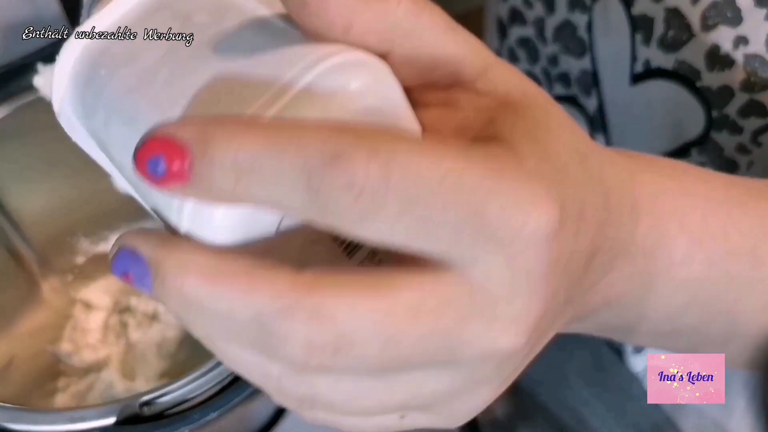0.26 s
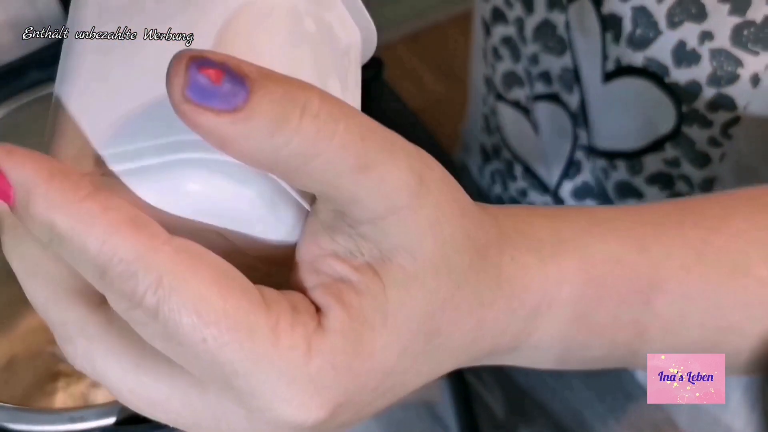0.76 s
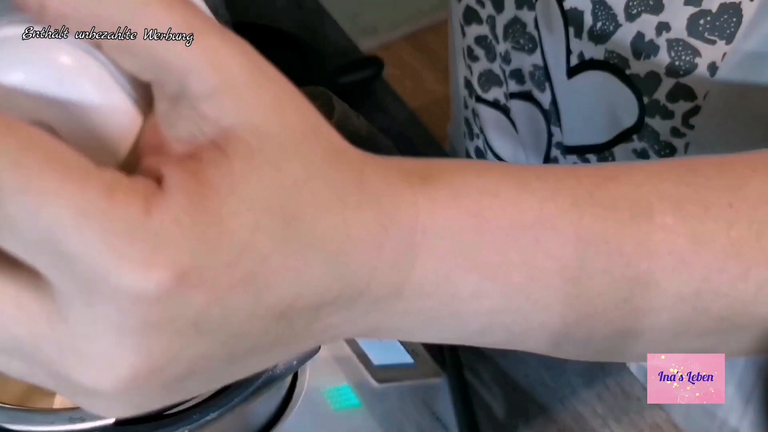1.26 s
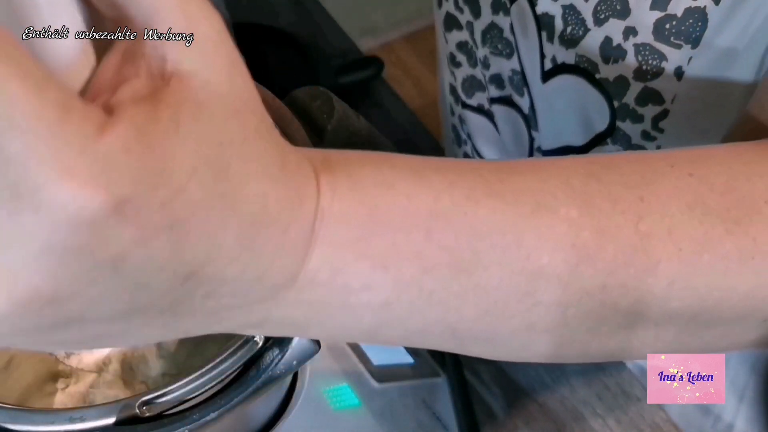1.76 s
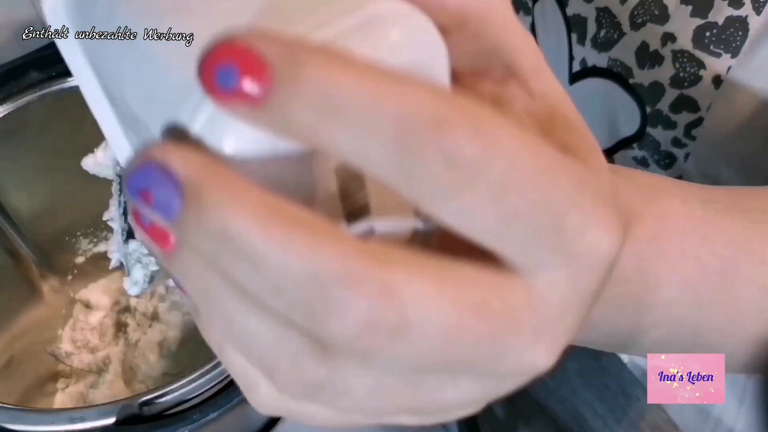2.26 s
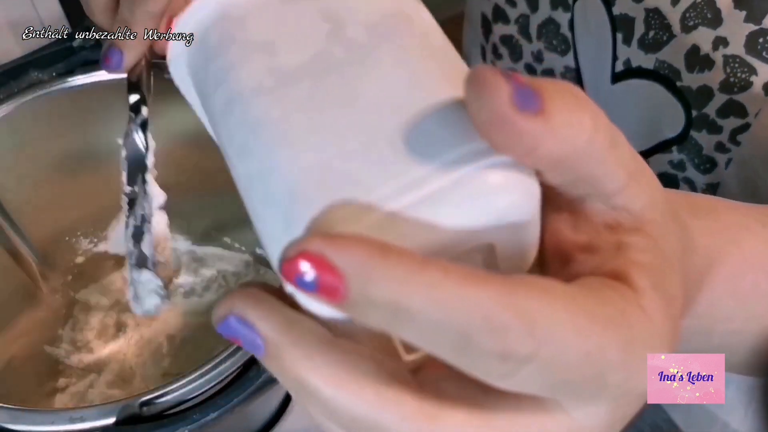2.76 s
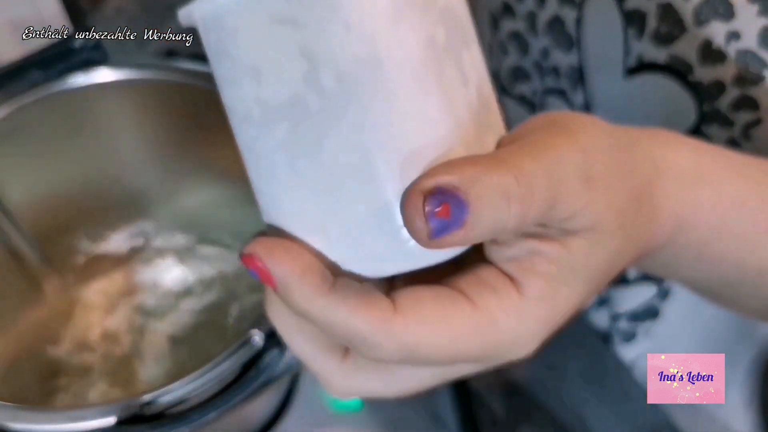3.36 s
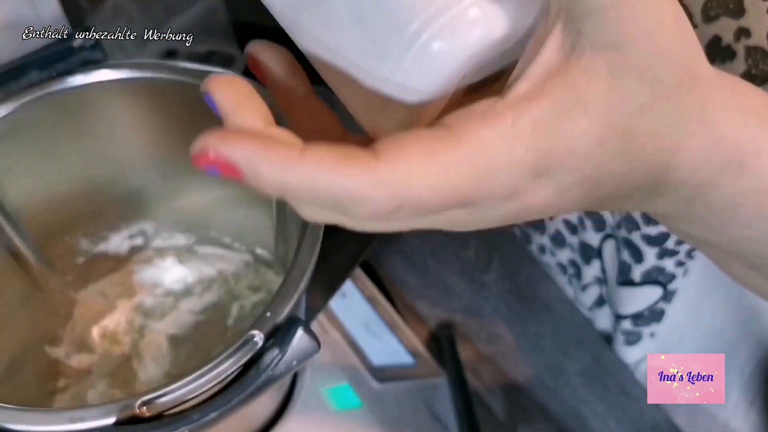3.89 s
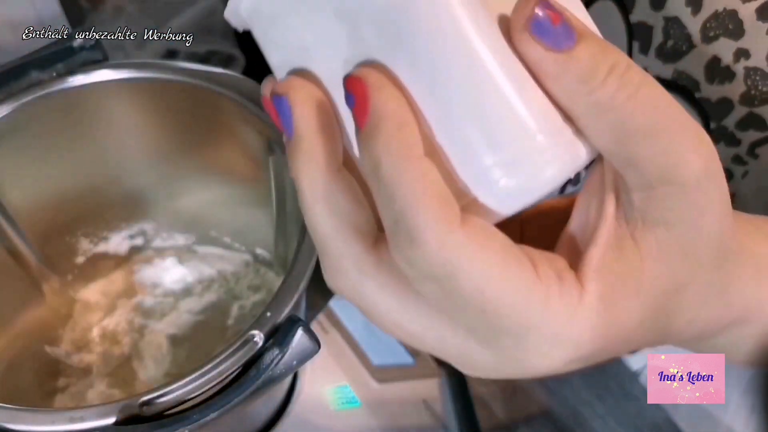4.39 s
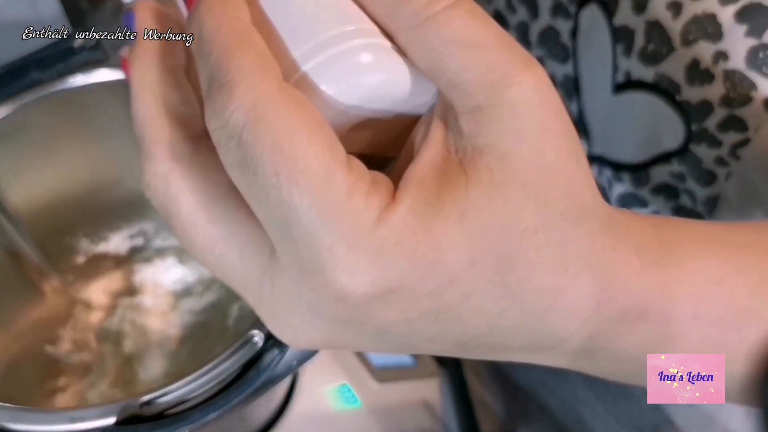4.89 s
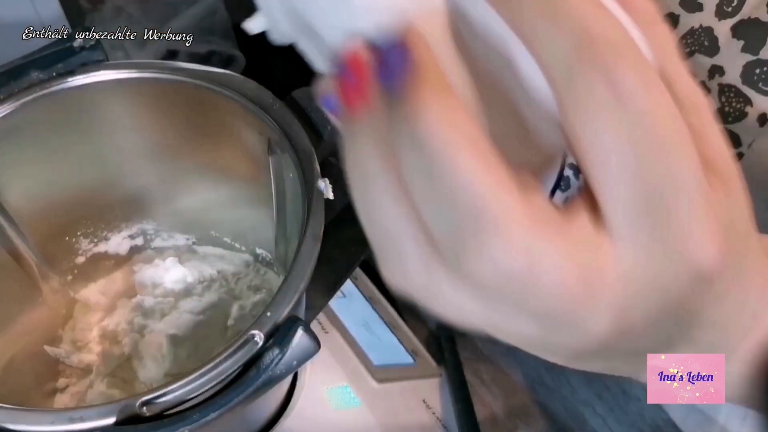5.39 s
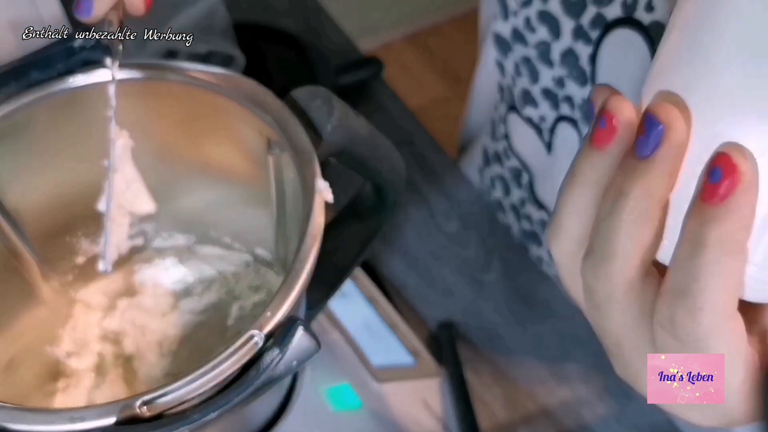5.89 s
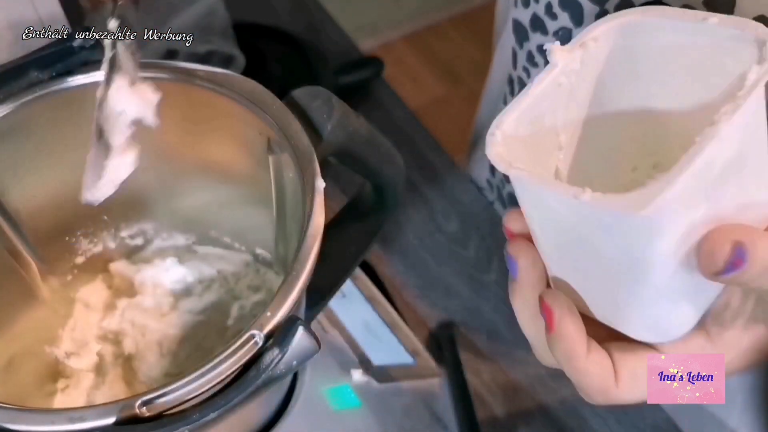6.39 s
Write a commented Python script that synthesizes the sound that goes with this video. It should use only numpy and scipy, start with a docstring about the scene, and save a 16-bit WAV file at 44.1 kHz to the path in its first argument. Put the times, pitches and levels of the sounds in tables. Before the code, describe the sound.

Very close in a quiet kitchen, a metal blade scrapes out a hollow plastic tub. After a nearly silent first moment, a busy run of hollow knocks and gritty hissing strokes, then a pause with light finger brushes, then more knocks and scrapes and one last firm knock before soft handling bumps. A faint low motor hum lies beneath; the tub sounds mostly from the left.

```python
"""Scraping out a plastic tub

A steel blade scrapes soft food out of a plastic tub over a mixing bowl in a quiet kitchen.
Each stroke hisses along the wall as tiny slips and sets the hollow tub murmuring through its modes.
The blade knocks on wall and rim, fingers brush the tub, and it bumps softly in the hand.
An appliance hums far off; two close microphone ports hear the tub mostly from the left."""
import sys
import numpy as np
from scipy import signal
from scipy.io import wavfile
from scipy.ndimage import uniform_filter1d, map_coordinates

SR = 44100
rng = np.random.default_rng(int(sys.argv[2]) if len(sys.argv) > 2 else 0)


def store_wav(level_fs):
    """Save 16-bit WAV to argv[1]."""
    pcm = np.round(np.clip(np.atleast_2d(level_fs), -1, 1) * 32767)
    wavfile.write(sys.argv[1], SR, pcm.T.astype(np.int16))


N = 293255   # length in samples


def amp(db):
    """Turn dB into a plain gain."""
    return 10 ** (np.asarray(db) / 20)


def rms_one(x):
    """Scale to an rms of 1."""
    return x / np.sqrt(np.mean(x ** 2) + 1e-20)


def top_one(x):
    """Scale to a peak of 1."""
    return x / np.abs(x).max()


def at_hz(points, hz):
    """Read a curve of (Hz, value) points along a log frequency axis."""
    curve_hz, values = np.transpose(points)
    return np.interp(np.log(hz), np.log(curve_hz), values)


def pan(x, left_minus_right_db):
    """Lift one port and lower the other by half the difference each."""
    return x * amp(np.array([[0.5], [-0.5]]) * left_minus_right_db)


def filtered(x, order, hz, kind="low"):
    """Butterworth filter."""
    return signal.sosfilt(signal.butter(order, hz, kind, fs=SR, output="sos"), x)


def drift(rate_hz):
    """Slow chance of spread 1: noise through two equal poles, made at 1/40 of the sample rate."""
    r = np.exp(-2 * np.pi * rate_hz * 40 / SR)
    noise = rng.standard_normal(N // 40 + 2002)
    slow = signal.lfilter([1], [1, -2 * r, r * r], noise)[2000:]
    return np.interp(np.arange(N) / 40, np.arange(len(slow)), rms_one(slow))


def bands(x, low_hz, octaves):
    """Bands of a given width with their centres; neighbours come from different rows of x."""
    edges = low_hz * 2 ** np.arange(0, np.log2(19000 / low_hz), octaves)
    for k, (low, high) in enumerate(zip(edges, edges[1:])):
        yield np.sqrt(low * high), filtered(x[k % 2], 2, [low, high], "band")


def grit(per_s, spread_db, rows):
    """Tiny slips of the edge at random moments with uneven sizes and either sign."""
    excess_db = spread_db * np.minimum(rng.exponential(1, (rows, N)), 4)
    sizes = amp(excess_db) * rng.choice([-1, 1], (rows, N))
    happens = rng.random((rows, N)) < per_s / SR
    return rms_one(sizes * happens)


# Colour of the air. Each row: frequency in Hz, relative level in dB.
AIR_COLOUR = [(15, -32), (25, 1.5), (64, -5.5), (170, -8.5), (270, -12), (516, -18), (887, -75),
              (1190, -29), (2160, -27.5), (6050, -44), (10700, -29), (16000, -36)]
# Likeness of the air at the two ports. Each row: frequency in Hz, left-right likeness (1 = identical).
AIR_LIKENESS = [(50, 0.1), (1000, 0.29), (8000, 0.53)]
AIR_DB, AIR_PAN_DB = -68, 2


def air():
    """Room air and microphone noise: coloured noise bands, each gently patchy, partly shared by the ports."""
    out = 0
    noise = rng.standard_normal((2, 2, N))
    for hz, (mid, side) in bands(noise, low_hz=22.6, octaves=0.43):
        alike = np.clip(at_hz(AIR_LIKENESS, hz), -1, 1)
        gain = amp(at_hz(AIR_COLOUR, hz) + 0.57 * drift(10))
        out = out + gain * (np.sqrt(1 + alike) * mid + np.sqrt(1 - alike) * side * [[1], [-1]])
    return pan(amp(AIR_DB) * rms_one(out), AIR_PAN_DB)


# The appliance. Each row: pitch in Hz, width of the pitch waver in Hz (twice its spread),
# level in dB before the common lift.
HUM_TONES = [(55, 2.8, -72), (114, 18, -82.5)]
HUM_LIFT_DB, HUM_PAN_DB = 5.5, 6.5


def hum():
    """A motor drone: a tone and another about an octave up that waver in pitch and level."""
    out = 0
    for hz, width_hz, db in HUM_TONES:
        level = amp(db + HUM_LIFT_DB + 0.7 * drift(7))
        pitch_hz = hz + width_hz / 2 * drift(3)
        out = out + level * np.sin(2 * np.pi * np.cumsum(pitch_hz) / SR)
    return pan(out, HUM_PAN_DB)


KITCHEN_DB, KITCHEN_T60_S, DULL_BELOW_HZ = -11, 0.25, 2800


def kitchen(x):
    """Dense reflections, unlike at each port, starting after the nearest wall; the treble dies faster."""
    t = np.arange(SR // 2) / SR
    noise = rng.standard_normal((2, len(t))) * (t > 0.006)
    dull = filtered(noise, 1, DULL_BELOW_HZ)
    treble = noise - dull
    tail = dull * amp(-60 * t / KITCHEN_T60_S) + treble * amp(-60 * t / (0.6 * KITCHEN_T60_S))
    tail = tail / np.sqrt(np.sum(tail ** 2) / 2)
    return signal.fftconvolve(x[None], tail, axes=1)[:, :N]


# Soft low bumps of the tub in the hand. Each row: start in seconds,
# level in dB before the soft attack, pitch in Hz.
HAND_BUMPS = [(1.214, -46.5, 196), (6.224, -52.5, 230), (6.285, -50.5, 297), (6.32, -51, 218),
              (6.472, -43.5, 326)]
BUMP_T60_S, BUMP_ATTACK_S = 0.091, 0.0034


def bumps():
    """A short soft push rings one low mode."""
    age, out = np.arange(SR // 4) / SR, np.zeros(N + SR)
    attack = 1 - np.exp(-age / BUMP_ATTACK_S)
    for s, db, hz in HAND_BUMPS:
        at = round(s * SR)
        ringing = amp(db - 60 * age / BUMP_T60_S) * np.sin(2 * np.pi * hz * age)
        out[at:at + len(age)] += attack * ringing
    return out[:N]


def ring(clicks, hz, t60):
    """A two-pole resonator: a unit click sets a sine of height 1 ringing."""
    r, w = amp(-60 / (t60 * SR)), 2 * np.pi * hz / SR
    return signal.lfilter([0, np.sin(w)], [1, -2 * r * np.cos(w), r * r], clicks + 1e-18)


# Modes of the tub: the whole tub giving way in the hand, its body, its thin wall.
# Each row: frequency in Hz, relative level in dB, t60 in seconds.
GRIP_MODES = [(108, 7, 0.075), (176, 10, 0.029), (309.2, 4.5, 0.19)]
BODY_MODES = [(443, -7, 0.033), (571, -9, 0.041), (713, -4, 0.029), (786, -7.5, 0.07), (935, 0, 0.018),
              (1191, -10.5, 0.027)]
WALL_MODES = [(1300, -3.5, 0.008), (1670, -9, .012), (1930, -7, 0.02), (2256, 0, 0.011), (2800, -6, 0.007),
              (3600, -15, .005), (4600, -20, .004)]
MODE_LUCK_DB = 2.5   # how much a mode's strength varies with the place of contact
GRIP_PAN_DB = 5.5


def strike(force, modes, db_by_mode):
    """A force rings all modes of a table, signs alternating, each with a strength of its own."""
    out = 0
    for k, ((hz, db, t60), more_db) in enumerate(zip(modes, db_by_mode)):
        out = out + (-1) ** k * amp(db + more_db) * ring(force, hz, t60)
    return out


# The tub turns in the hand. Each row: time in seconds, left minus right in dB,
# lead of the left port in ticks of 1/1.17 microsecond, loudest wall mode in Hz.
TUB_PLACE = [(0.0, 2, 330, 1840), (1.3, 6, 190, 1850), (1.7, 3, 460, 2200), (3.6, 4, 119, 2170),
             (4.05, 4, 130, 2160), (4.3, 0, 131, 2550), (4.7, 1.5, 117, 2153), (5.2, 1.5, 247, 2250),
             (5.7, 2, 152, 2490), (6.65, -3.5, 98, 2240)]
TICKS_PER_S = 1.17e6


def turning():
    """Glide from place to place: pan in dB, lead of the left port in ticks, wall mode in Hz."""
    s, *columns = np.transpose(TUB_PLACE)
    return [np.interp(np.arange(N) / SR, s, column) for column in columns]


# Blade on tub. Each row: start in seconds, level in dB, cavity pitch in Hz, then the wall,
# the crack and the thump in dB relative to that level.
BLADE_KNOCKS = [(0.175, -54.5, 450, -28, -29, -11), (0.818, -40.5, 806, 7.5, -2, 2.5),
                (0.87, -26.5, 690, -2, -19, -45), (0.923, -33, 845, -1, -8, -19.5),
                (1.154, -34.5, 810, 1, -7, -26), (1.212, -41, 805, -12, 4, -4),
                (1.377, -46, 790, -18, -2, -27), (1.391, -38.5, 723, -32, 1.5, -19),
                (1.448, -24.5, 790, 1, -4.5, -43), (1.526, -23.5, 800, -7.5, -32, -53),
                (1.548, -24, 774, -18, -25, -43), (1.678, -15, 803, -10.5, -36, -30),
                (1.718, -19, 693, -2, 1.5, -24.5), (2.069, -46, 488, -11, -30, -26),
                (2.694, -48.5, 893, -1, -32.5, -22.5), (3.085, -61.5, 450, -27.5, -23.5, -13.5),
                (3.251, -55, 854, -1, -3.5, -22), (3.545, -23.5, 644, -9, -7.5, -18.5),
                (3.586, -27, 740, 6.5, 3, -16), (3.72, -22, 917, -9, -48, -12.5),
                (3.852, -31, 960, -4, -20, -45), (3.963, -35, 807, -33, -8, -8.5),
                (4.026, -24, 470, 4, 2.5, -33), (4.116, -30, 699, -8, -13.5, -18),
                (4.315, -24.5, 782, -0.5, -34, -43), (4.35, -29.5, 597, 3.5, 3.5, -11.5),
                (4.45, -41.5, 794, -28, -37, -11.5), (4.708, -56.5, 1040, 20, 11, 3),
                (4.735, -45.5, 864, -19, -37, -12), (4.757, -46.5, 750, -17, -29, -1.5),
                (5.123, -26, 929, -6, -14, -25), (5.343, -35, 990, 5, -31, -5.5),
                (5.351, -26.5, 911, -9.5, -24, -18), (5.469, -42, 779, -22, -16.5, -17),
                (5.527, -34, 915, -1, -6, -30), (5.733, -54, 870, -3, -29, -25),
                (5.776, -16.5, 870, -5.5, -35, -26.5), (6.472, -56.5, 417, -20, 1, 9)]
RATTLE_T60_S = 0.022   # how long the blade chatters after landing
CAVITY_T60_S, WALL_T60_S = 0.008, 0.013


def knocks():
    """Each blow is a rough contact ringing cavity, body and wall, with a crack; returns shell, grip, crack."""
    out, t = np.zeros((3, N + SR)), np.arange(SR // 5) / SR
    _, _, wall_mode_hz = turning()
    press = (1 - np.exp(-t / 0.0013)) * amp(-60 * t / RATTLE_T60_S)
    for s, level_db, cavity_hz, wall_db, crack_db, thump_db in BLADE_KNOCKS:
        at = round(s * SR)
        rough = rng.standard_normal(len(t))
        luck_db = MODE_LUCK_DB * rough   # its last values set the mode strengths
        # the blade skips on the wall in step with the cavity, and roughly besides
        skip = press * np.sin(2 * np.pi * cavity_hz * t)
        chatter = press * rough
        chatter[round(0.0008 * SR)] += 0.39 * np.sqrt(np.sum(press ** 2))   # the first landing is the hardest
        # softer landings push more slowly
        chatter = filtered(chatter, 2, np.clip(9000 * amp(0.067 * crack_db), 3000, 15000))

        cavity = top_one(ring(skip, cavity_hz, CAVITY_T60_S))
        low = cavity + amp(-2.5) * top_one(strike(chatter, BODY_MODES, luck_db[-9:]))
        main_wall = top_one(ring(chatter, wall_mode_hz[at], WALL_T60_S))
        wall = main_wall + amp(2.5) * top_one(strike(chatter, WALL_MODES, luck_db[-19:]))
        shell = amp(-0.1) * top_one(low) + amp(wall_db) * top_one(wall)
        grip = amp(thump_db) * top_one(strike(chatter, GRIP_MODES, luck_db[-29:]))

        crack = rough * (1 - np.exp(-t / 0.00031)) * (np.exp(-t / 0.006) + 0.9 * press)
        edge_hz = np.clip(11000 * amp(0.3 * crack_db), 4500, 15000)   # a soft landing cracks duller
        crack = amp(crack_db) * top_one(filtered(crack, 2, [2200, edge_hz], "band"))
        out[:, at:at + len(t)] += amp(level_db) * np.array([shell, grip, crack])
    return out[:, :N]


SWELL_DB = 11.5   # rise from start to firmest moment, besides the 20 dB fade-in of the touch
TOUCH_S = 0.019   # the edge settles on the wall


def easing(start_s, firm_s, fade_db_per_s):
    """From a stroke's start on, dB below its firmest moment: it touches, swells steadily, fades steadily."""
    at = round(start_s * SR)
    t = np.arange(at, min(at + SR, N)) / SR
    swell = SWELL_DB * (firm_s - t) / max(firm_s - start_s, 0.003)
    touch = 20 * np.exp(-(t - start_s) / TOUCH_S)
    return slice(at, at + SR), np.where(t < firm_s, swell + touch, fade_db_per_s * (t - firm_s))


# The edge sliding on the wall. Each row: start in seconds, firmest moment in seconds, hiss in relative dB,
# fade in dB per second, murmur of the hollow tub in relative dB, hiss tilt in dB per octave.
SCRAPE_STROKES = [(0.824, 0.9, -38.5, 193, -48, 1), (1.166, 1.232, -38, 200.5, -56, 0),
                  (1.256, 1.257, -47.5, 309, -71, 16), (1.471, 1.61, -40.5, 190.5, -46, -1),
                  (1.627, 1.638, -35, 138, -58.5, 2.5), (1.698, 1.708, -36.5, 115.5, -43.5, -0.5),
                  (1.825, 1.861, -41, 165, -46.5, 3), (1.91, 2.022, -53.5, 269, -85, 3),
                  (2.098, 2.073, -85, 292, -73, 7), (3.566, 3.702, -49, 161, -52, 3),
                  (3.864, 3.882, -50.5, 135, -58.5, 5), (3.943, 3.92, -80, 113, -57, -7),
                  (4.02, 4.039, -48, 122, -43.5, 2), (4.338, 4.351, -39, 212, -41.5, 2.5),
                  (4.682, 4.689, -61, 131, -67.5, -2.5), (4.946, 5.056, -40, 108.5, -57, 1.5),
                  (5.08, 5.092, -41.5, 267, -62, -1), (5.165, 5.238, -43, 292, -42.5, -1.5),
                  (5.28, 5.324, -37, 257.5, -45.5, 0.5), (5.395, 5.451, -45.5, 201, -53, 4),
                  (5.49, 5.512, -57.5, 241, -45, -7)]
MURMUR_FADE_SHARE = 0.88   # the tub quietens more slowly than the edge
MURMUR_REST_DB = -80.5     # the tub merely held


def shaking():
    """How hard the strokes shake the hollow tub."""
    level = np.full(N, amp(MURMUR_REST_DB))
    for start_s, firm_s, _, fade, murmur_db, _ in SCRAPE_STROKES:
        span, below_db = easing(start_s, firm_s, MURMUR_FADE_SHARE * fade)
        level[span] += amp(murmur_db - below_db)
    return uniform_filter1d(level, size=256)


def murmur():
    """Coarser slips drive the tub's modes; returns the shell's sound and the grip's."""
    slips = grit(per_s=510, spread_db=3.5, rows=1)[0] * amp(3 * drift(30))

    def driven(modes):
        """Ring one table of modes while their strengths wander."""
        return rms_one(strike(slips, modes, [MODE_LUCK_DB * drift(4.1) for _ in modes]))

    shell = driven(BODY_MODES) + amp(-13.5) * driven(WALL_MODES)
    grip = amp(-14.5) * driven(GRIP_MODES)
    return shaking() * np.array([shell, grip])


# Fingers brushing the tub between strokes. Each row: start in seconds, hiss in relative dB.
FINGER_BRUSHES = [(0.043, -57), (0.155, -60.5), (2.6805, -60.5), (3.065, -74), (3.161, -62.5),
                  (3.2404, -60), (3.3822, -65), (3.4814, -66), (4.799, -66), (5.662, -58), (6.1263, -56),
                  (6.252, -57), (6.467, -63), (6.6094, -70)]
BRUSH_T60_S, HISS_REST_DB = 0.16, -80
FINGER_TILT_DB_PER_OCT = 2.5
DULLING = 0.082   # a stroke's loss of tilt, dB per octave for each dB below full pressure


def sliding():
    """Level and tilt of the hiss: the shifting grip, strokes, and brushes that swell fast and die away."""
    level = amp(HISS_REST_DB + 3.5 * drift(8))
    for s, db in FINGER_BRUSHES:
        at = round(s * SR)
        age = np.arange(min(SR // 2, N - at)) / SR
        level[at:at + SR // 2] += amp(db - 60 * age / BRUSH_T60_S) * (1 - np.exp(-age / 0.011))
    tilted = FINGER_TILT_DB_PER_OCT * level   # tilts are averaged by level
    for start_s, firm_s, hiss_db, fade, _, tilt_db in SCRAPE_STROKES:
        span, below_db = easing(start_s, firm_s, fade)
        stroke = amp(hiss_db - below_db)
        level[span] += stroke
        tilted[span] += stroke * (tilt_db - DULLING * below_db)
    return uniform_filter1d(level, size=64), tilted / level


# Colour of the hiss before tilting. Each row: frequency in Hz, relative density in dB per Hz.
HISS_COLOUR = [(710, -41), (1200, -23), (1560, -7), (2320, -3.5), (3080, -4.5), (3660, -1.5), (4960, -2),
               (11700, -7), (16000, -18)]
# Likeness of the hiss at the ports. Each row: frequency in Hz, share of power common to both.
HISS_LIKENESS = [(2000, 0.54), (4000, 0.42), (8000, 1), (13000, 0.86)]
HISS_LIFT_DB = 1.5


def rubbing():
    """Slips sound directly as hiss, flickering in level band by band, partly unlike at the two ports."""
    level, tilt = sliding()
    judder, hiss, power = drift(18), 0, 0
    slips = grit(per_s=12000, spread_db=1.5, rows=4).reshape(2, 2, N)
    for hz, (mid, side) in bands(slips, low_hz=1225, octaves=0.2463):
        gain = amp(at_hz(HISS_COLOUR, hz) + tilt * np.log2(hz / 6500))
        alike = np.clip(at_hz(HISS_LIKENESS, hz), 0, 1)
        both = np.sqrt(alike) * mid + np.sqrt(1 - alike) * side * [[1], [-1]]
        hiss = hiss + gain * both * amp(2.8 * judder + 4.62 * drift(18))
        power = power + gain ** 2 * hz / SR
    # dividing by the power keeps the tilt from changing the loudness
    return amp(HISS_LIFT_DB) * level * hiss / np.sqrt(power)


def scene():
    """The tub's ringing reaches the left port first; the room answers on both."""
    shell, grip, crack = knocks()
    # a small tub radiates no deep bass
    shell, grip = filtered(murmur() + [shell, grip], 2, 80, "high")
    pan_db, lead_ticks, _ = turning()
    late_shell = map_coordinates(shell, [np.arange(N) - lead_ticks * SR / TICKS_PER_S], order=1)
    left, right = np.array([shell, late_shell]) + crack + rubbing()
    held = pan(grip + bumps(), GRIP_PAN_DB)
    near = pan(np.array([left, right]) + held, pan_db)
    return near + amp(KITCHEN_DB) * kitchen(left + grip) + air() + hum()


def record(dry):
    """The top is cut steeply: 70 dB down from 16600 Hz up."""
    return signal.sosfilt(signal.cheby2(14, 70, 16600, fs=SR, output="sos"), dry)


dry = scene()
out = record(dry)
store_wav(out)
```